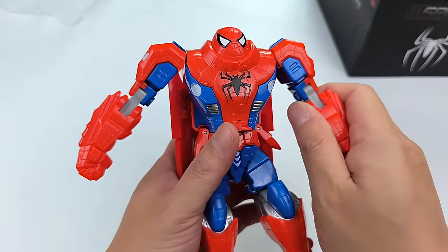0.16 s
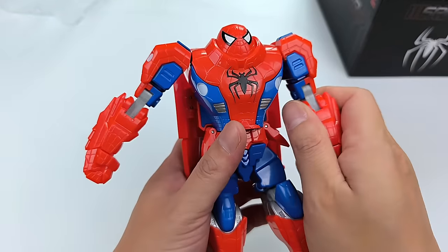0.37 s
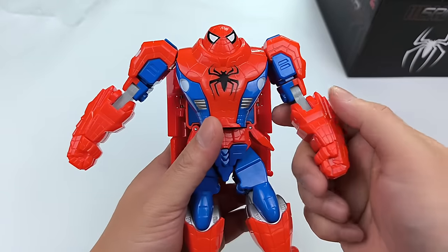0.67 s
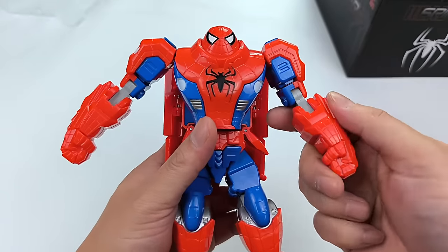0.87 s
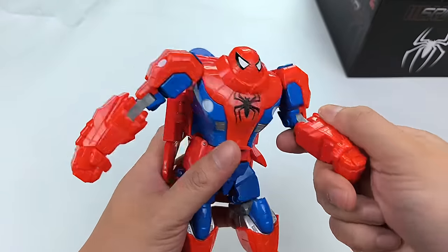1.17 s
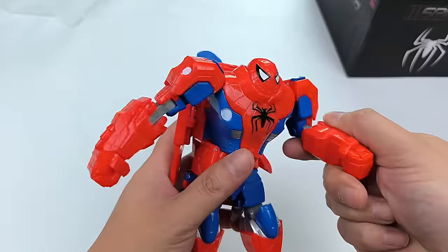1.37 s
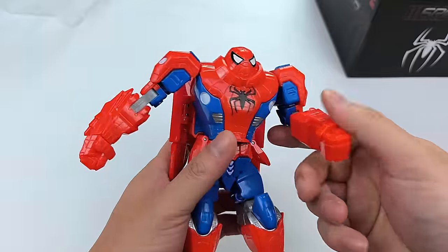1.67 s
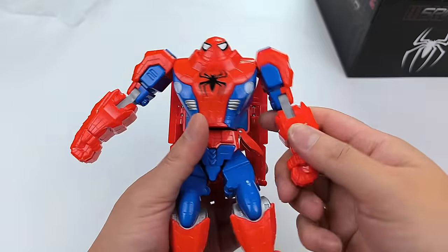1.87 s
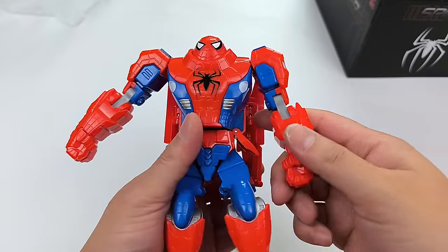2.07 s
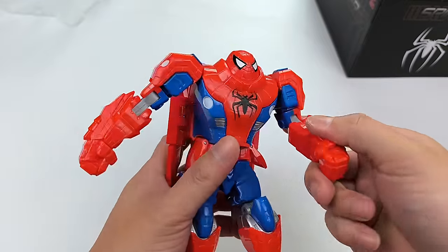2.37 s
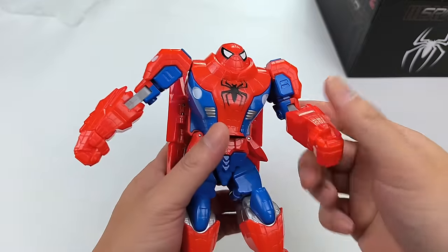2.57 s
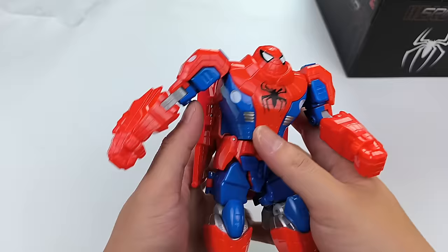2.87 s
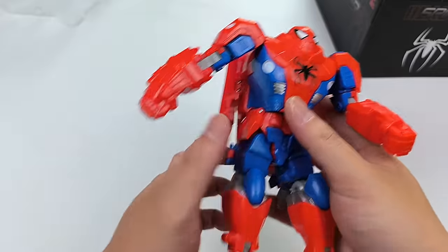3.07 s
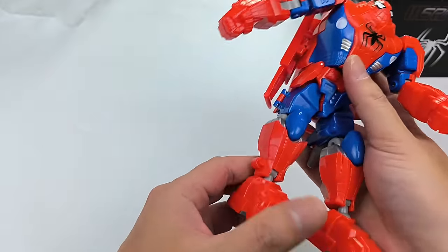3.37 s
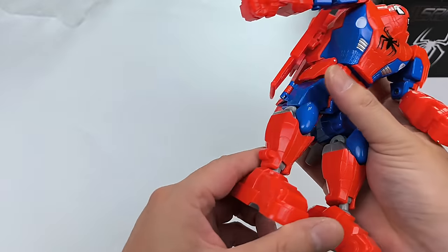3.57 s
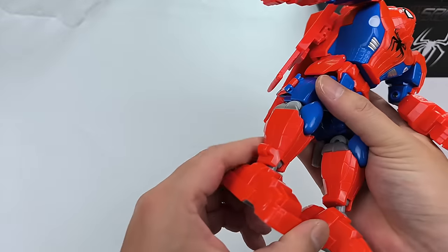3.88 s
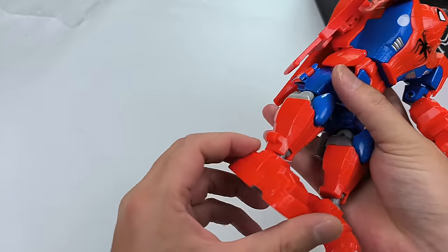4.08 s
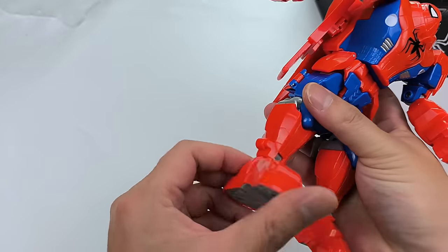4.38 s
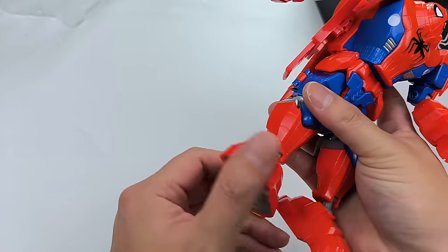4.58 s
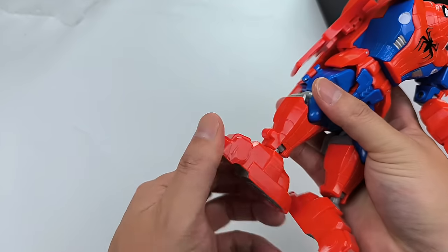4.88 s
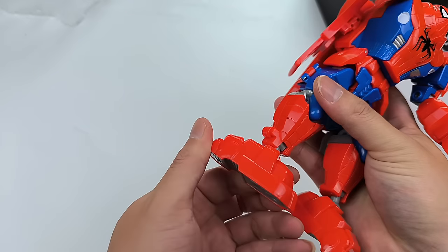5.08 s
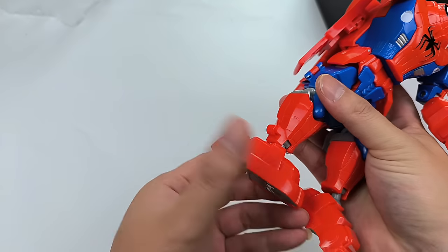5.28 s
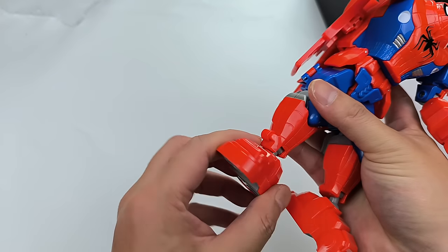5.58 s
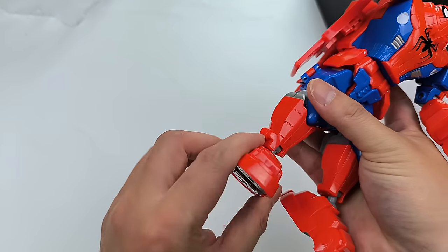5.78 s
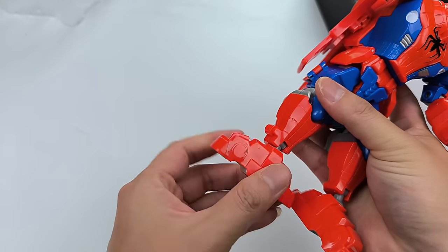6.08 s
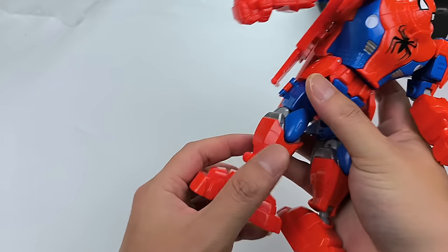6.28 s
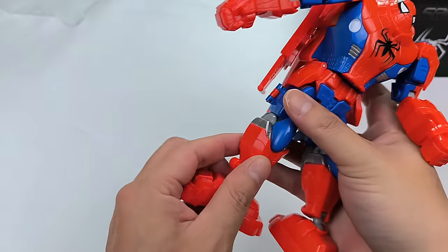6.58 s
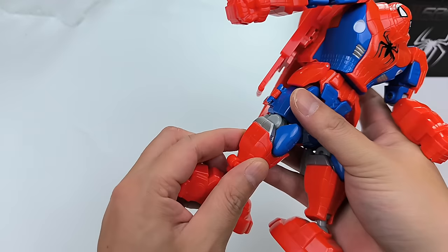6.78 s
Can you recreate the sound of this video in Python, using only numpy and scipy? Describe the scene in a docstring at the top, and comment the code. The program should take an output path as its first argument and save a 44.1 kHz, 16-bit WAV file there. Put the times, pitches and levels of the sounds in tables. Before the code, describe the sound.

Close, dry plastic clacks and clicking detents from a jointed toy figure in a small bright room, with light ticks and brief scrapes between.

```python
"""A hard plastic toy robot, posed by two hands just above a table, close to a stereo microphone in a small room.
Joint detents snap over and loose panels tick: each blow is a noise burst that rings the hollow shell for
a few milliseconds. Between the clicks joints and fingers rub by stick and slip, and a faint whistle glides.
The room answers with a bright tail of decaying noise, over a soft hush of shaped noise."""
import sys
import numpy as np
from scipy import signal
from scipy.fft import rfft, irfft
from scipy.io import wavfile
from scipy.ndimage import uniform_filter1d

SR = 44100
rng = np.random.default_rng(int(sys.argv[2]) if len(sys.argv) > 2 else 0)


def generate_wav(sig):
    """Save sig (samples, or channels by samples) to the path in sys.argv[1] as 16-bit PCM at SR."""
    pcm = np.round(np.clip(np.atleast_2d(sig).T, -1, 1) * 32767).astype(np.int16)
    wavfile.write(sys.argv[1], SR, pcm)


N = 305172

# The ranges that a blow excites, from the whole toy down to the contact point:
# knock, chest, panel, shell, edge, fizz. Each row: low edge in Hz, high edge in Hz.
REGISTERS = [(125, 900), (950, 1900), (1900, 3500), (3500, 6300), (6300, 9500), (9500, 17500)]
# Light ticks: their balance over the registers. Each entry: relative level in dB.
TICK_COLOUR = [-6.5, 3.63, 1.7, 1, -2.2, -16]
# A stiff joint snaps home. Each row: time in seconds, strength in dB, brightness in dB per octave,
# thump of the whole toy in dB, pitch of the struck part in Hz, rattle decay in seconds, left-right in dB.
JOINT_SNAPS = [(0.2001, -23, 3.5, 9.5, 5540, .0013, -1.5), (6.613, -25, -1, -9.5, 3260, 0.00164, -4),
               (6.884, -24.5, 1.5, 1, 4900, 0.00186, -5.5)]
# The shoulder ratchet jumps a tooth. Each row: time in seconds, crack in dB, brightness in dB per octave,
# pitch of the struck part in Hz, knock of the chest in dB, delay of that knock in seconds, left-right in dB.
RATCHET_TEETH = [(1.0319, -39.5, -1, 2310, -40.5, 0.0033, 0.5),
                 (1.1023, -52, -3, 1450, -40.5, 0.00092, 1.5), (1.3015, -43, 2.5, 7550, -40, 0.0028, 1),
                 (1.723, -33, 1.5, 4200, -40.5, .003, 0.5), (1.7787, -30, 1, 5100, -35, 0.0043, -0.5),
                 (1.8391, -32.5, 1, 4400, -38.5, .004, 0), (2.2454, -32, 1, 8100, -38.5, 0.0021, 1),
                 (2.305, -37, 0.5, 8200, -38.5, 0.0016, -1)]


def amp(db):
    """Decibels to gain."""
    return 10 ** (np.asarray(db) / 20)


def unit(x):
    """Scales to rms 1."""
    return x / np.sqrt(np.mean(x ** 2) + 1e-20)


def read(points, hz):
    """Reads a curve off its points on a log-frequency axis."""
    f, value = np.transpose(points)
    return np.interp(np.log(hz + 1), np.log(f), value)


def add(mix, s, sound):
    """Mixes a stereo sound in at time s."""
    start = max(round(s * SR), 0)
    part = mix[:, start:][:, :sound.shape[1]]
    part += sound[:, :part.shape[1]]


def band(x, low_hz, high_hz, order=3):
    """Causal band-pass."""
    edges_hz = [low_hz, min(high_hz, .49 * SR)]
    return signal.sosfilt(signal.butter(order, edges_hz, "band", fs=SR, output="sos"), x)


def pair(x, likeness):
    """Turns two unrelated signals into two partly alike channels."""
    c = np.clip(likeness, 0, 1)
    shared = np.array([[1], [1]]) * np.sqrt((1 + c) / 2) * x[0]
    opposed = np.array([[1], [-1]]) * np.sqrt((1 - c) / 2) * x[1]
    return shared + opposed


def causal(gain):
    """The minimum-phase response that has this gain, by folding its cepstrum."""
    cepstrum = irfft(np.log(gain + 1e-9))
    half = cepstrum.shape[-1] // 2
    cepstrum[..., 1:half] *= 2
    cepstrum[..., half + 1:] = 0
    return np.exp(rfft(cepstrum))


def hush(likeness=0.042, level_db=-63.5):
    """The steady, dull background of the room: noise filtered to a falling spectrum."""
    # Colour of the background. Each row: frequency in Hz, relative density in dB per Hz.
    hush_colour = [(15, -40), (25, -22), (161, -4.5), (373, -6.5), (427, -8), (503, -7.5), (1130, -12.5),
                   (1400, -12.5), (1560, -13), (2000, -13), (2550, -16), (3080, -16), (6920, -27),
                   (10400, -40.5), (16000, -29.5)]
    noise = pair(rng.standard_normal((2, N)), likeness)
    gain = amp(read(hush_colour, np.fft.rfftfreq(N, 1 / SR)))
    return amp(level_db) * unit(irfft(rfft(noise) * gain, N))


def blow(colour_db, strength_db, bright_db=0, hollow_db=0, thump_db=0, fizz_db=0):
    """Strength of each register: brightness tilts the colour up, the chest and the toy's bulk fill the bottom."""
    # How each register answers a blow. Each row: octaves of brightness tilt against the shell's register,
    # share of the chest's ring, share of the thump, share of the fizz.
    response = [(-1.5, .5, 1, 0), (-1.5, 1, .4, 0), (-.8, 0, 0, 0), (0, 0, 0, 0), (.7, 0, 0, 0),
                (1.5, 0, 0, 1)]
    return strength_db + np.array(colour_db) + np.array(response) @ [bright_db, hollow_db, thump_db, fizz_db]


def ticks(usual_decay_s=.0024, fizz_db_per_halving=8, part_db=13.5, focus_db=4.5, focus_octaves=0.55):
    """A light blow is lifted around the pitch of the part it strikes; the sooner it dies, the more it fizzes."""
    # A loose panel or finger joint ticks. Each row: time in seconds, strength in dB, brightness in dB per
    # octave, ring of the hollow chest in dB, pitch of the struck part in Hz, rattle decay in seconds,
    # left-right in dB.
    loose_parts = [(.079, -59.5, -0.5, 3, 2140, .0029, 1), (.11, -66, 2, 10.5, 2100, .0024, -1),
                   (.138, -63, 5.5, 10, 2170, 0.0025, -2.5), (.4954, -54, -2, -13.5, 2380, 0.0018, 0.5),
                   (.6038, -59.5, -2, -13, 2630, 0.0011, -7.5), (.6818, -51, 5.5, -3, 2700, .0024, 1.5),
                   (.6987, -59.5, 7, 8.5, 4070, 0.0017, 3), (.9904, -56.5, -4, -6.5, 2280, 0.0033, 4),
                   (1.358, -74.5, 2.5, 19.5, 1770, 0.0013, -9), (1.39, -64.5, 1, -1, 2350, 0.0017, 0),
                   (1.4048, -66, -6.5, -4.5, 2310, 0.0015, -1), (1.67, -63, -9, -8, 1720, 0.00272, .5),
                   (2.112, -67.5, -3.5, -4, 2600, 0.00245, -3), (2.125, -72.5, -7.5, -7, 2620, 0.00246, -2),
                   (2.1422, -72, -5.5, -8, 2500, 0.0013, 1), (2.2057, -75, -9, -6, 2440, 0.0012, -3),
                   (2.496, -61, 2, -17, 3300, .0016, -4.5), (2.502, -60.5, -2.5, -9, 3920, .0024, 2),
                   (2.5143, -67.5, -6, 2, 4480, 0.0032, 2), (2.5259, -65.5, 5, 10.5, 2170, .0028, -5),
                   (2.617, -64.5, -7.5, -15, 3120, 0.0021, -1.5), (2.7307, -62, 10.5, 11, 8750, 0.0016, 4),
                   (2.748, -53.5, 7, 2, 3900, 0.0024, 0.5), (2.7974, -56, 2, -1, 7100, 0.0038, -2),
                   (2.819, -64, -3, -3, 2450, 0.0029, 0), (2.8384, -56.5, 2, 7.5, 8500, 0.0026, .5),
                   (3.278, -73, 1, 4, 2600, .0022, -8), (3.365, -76, -6, -3, 2200, .002, 1),
                   (3.455, -73, 0.5, -2, 3100, .0021, -3.5), (3.5573, -66, 0, -12, 2210, .0026, -3),
                   (3.6299, -56, -1.5, -15, 3370, .003, -3), (3.9492, -62.5, 2.5, -0.5, 2744, 0.0033, -2),
                   (4.288, -62, 3.5, -9, 5730, .0022, -2), (4.5865, -67.5, .5, -5, 4580, .0024, 2),
                   (4.6224, -71.5, -5, -3, 2104, .0016, -5), (4.8818, -61.5, 2, 2, 4350, 0.0025, -3),
                   (5.1616, -66, 8, -3, 3920, .003, 13), (5.1792, -67.5, 4, -5, 4670, 0.002, -7.5),
                   (5.3111, -63, 4, -12, 3700, .0028, -2), (5.364, -66.5, -2, 3, 2820, .0029, -2),
                   (5.4253, -49, 2.5, -1.5, 1920, .0026, -0.5), (5.5828, -67.5, -2, -6.5, 2100, .0026, -1),
                   (5.7338, -51.5, 2, -9, 1980, .0032, -5), (5.866, -62.5, -2.5, -10, 2020, .0029, -3.5),
                   (5.9283, -56, 8, 4, 7110, 0.0015, 0), (6.0743, -64, 2, -7, 3610, 0.0034, 0),
                   (6.1644, -62.5, 3.5, -10, 3560, .0014, -1), (6.2437, -63.5, 2, 5, 1560, 0.0035, -1),
                   (6.36, -74, 10, -2, 5530, 0.0019, -1), (6.526, -61.5, 2, -10.5, 2020, .002, 0),
                   (6.5566, -70, 3, 15.5, 1970, .002, 0), (6.5743, -48.5, 1, -8, 7100, .003, -4)]
    centres_hz = np.sqrt(np.prod(REGISTERS, axis=1))
    for s, strength_db, bright_db, hollow_db, part_hz, decay_s, pan_db in loose_parts:
        octaves_away = np.log2(centres_hz / part_hz)
        focus = focus_db * np.exp(-(octaves_away / focus_octaves) ** 2)
        fizz_db = fizz_db_per_halving * np.log2(usual_decay_s / decay_s)
        strengths_db = blow(TICK_COLOUR, strength_db, bright_db, hollow_db, fizz_db=fizz_db) + focus
        yield s, decay_s, pan_db, part_hz, part_db, strengths_db


def faint_leads(lead_s=0.0025, level_db=-59, decay_s=.002, part_hz=3000, part_db=4):
    """A faint short blow set just ahead of each snap and detent."""
    # Balance of this faint blow over the registers. Each entry: relative level in dB.
    lead_colour = [-12.5, -3.5, -0.5, -1, -7, -8.5]
    for s, *_ in list(JOINT_SNAPS) + list(RATCHET_TEETH):
        yield s - lead_s, decay_s, 0, part_hz, part_db, blow(lead_colour, level_db)


def snaps(part_db=9):
    """Stiff joints snap home with one crisp blow each."""
    # Balance of a snap over the registers. Each entry: relative level in dB.
    snap_colour = [-18, -11.5, -5.5, 0.5, -1, -18]
    for s, strength_db, bright_db, thump_db, part_hz, decay_s, pan_db in JOINT_SNAPS:
        strengths_db = blow(snap_colour, strength_db, bright_db, thump_db=thump_db)
        yield s, decay_s, pan_db, part_hz, part_db, strengths_db


def detents(crack_s=0.00228, part_db=8, chest_s=0.00197, chest_hz=1550, chest_part_db=11,
            rebound_s=.0172, rebound_loss_db=-9, rebound_hz=1700, count=2):
    """The pawl cracks over a tooth, the hollow chest knocks just after, and the loose arm rebounds twice."""
    # Balance of the crack over the registers. Each entry: relative level in dB.
    crack_colour = [-14, -9.5, -6, -0.5, -1.5, -10.5]
    # Balance of the chest's knock over the registers. Each entry: relative level in dB.
    chest_colour = [-12.5, 1.5, -6.5, -32, -21.5, -31]
    # Balance of the arm's rebound over the registers. Each entry: level in dB against the chest's knock.
    rebound_colour = [-13, -10.5, -18, -15.5, -16.5, -28]
    for s, crack_db, bright_db, part_hz, chest_db, delay_s, pan_db in RATCHET_TEETH:
        yield s, crack_s, pan_db, part_hz, part_db, blow(crack_colour, crack_db, bright_db)
        yield s + delay_s, chest_s, pan_db, chest_hz, chest_part_db, blow(chest_colour, chest_db)
        for k in range(count):
            strengths_db = blow(rebound_colour, chest_db + k * rebound_loss_db)
            yield s + (k + 1) * rebound_s, crack_s, pan_db, rebound_hz, chest_part_db, strengths_db


def rattle(decay_s, linger_db=-21, linger_s=0.0079, likeness=0.51, size=2048):
    """A blow scatters through the joined parts: a dense burst, even in colour, that dies in milliseconds."""
    t = np.arange(size) / SR
    rise = 1 - np.exp(-t / .00012)
    fade = rise * (np.exp(-t / decay_s) + amp(linger_db) * np.exp(-t / linger_s))
    z = rfft(pair(rng.standard_normal((2, size)), likeness) * fade)
    smoothed = np.sqrt(uniform_filter1d(abs(z) ** 2, size=17, axis=1))
    return z / causal(smoothed)  # flattens the colour


def click(decay_s, pan_db, part_hz, part_db, strengths_db, part_q=11, push_db=3, push_hz=300, lag=.8,
          port_delay_s=.00002):
    """The burst rings the struck part and the body; where the toy is struck sets each register's strength."""
    # Modes of the plastic body. Each row: frequency in Hz, level in dB above the rattle, width in Hz.
    body_modes = [(796, 9.5, 90), (1360, 5.5, 240), (1546, 9, 86), (2600, 4.5, 110), (3770, -0.5, 230),
                  (4527, 3, 870), (5090, 2, 200), (7710, 8, 600)]
    # How the two microphone ports colour near sounds. Each row: frequency in Hz, left-right in dB.
    port_colour = [(200, -0.5), (3000, 1.5), (6000, 0), (7000, -10), (7800, -10), (8600, 3.5), (9300, 11.5),
                   (11500, -1), (15000, 2)]
    decay_s = max(decay_s, .0003)
    z = rattle(decay_s)
    hz = np.linspace(0, SR / 2, z.shape[1])
    # the whole toy jumps, most under a crisp snap
    z = z + amp(push_db) * (0.0025 / decay_s) / (1 + 1j * hz / push_hz)
    modes = list(body_modes) + [(part_hz, part_db, part_hz / part_q)]
    peaks = sum(amp(db) ** 2 / (1 + (2 * (hz - f) / width) ** 2) for f, db, width in modes)
    balance = amp(np.array([[.5], [-.5]]) * (read(port_colour, hz) + pan_db))
    # the left port hears it a moment later
    arrival = np.exp(-2j * np.pi * hz * np.array([[port_delay_s], [0]]))
    ring = irfft(z * causal(np.sqrt(1 + peaks) * balance) * arrival)
    parts = [amp(db) * unit(band(ring, *edges)) for db, edges in zip(strengths_db, REGISTERS)]
    # a loose joint reaches the hollow chest late
    late = round(lag * max(decay_s - .0015, 0) * SR)
    parts[1] = np.roll(parts[1], late, axis=1)
    # each register's strength is its rms as if all its energy fell within 10 ms
    return sum(parts) * np.sqrt(SR / 100 / ring.shape[1])


def clicks(hard_db=-28, send_slope=0.13):
    """Every snap and tick, near and as sent to the room: light ones are sent more weakly and leave less tail."""
    near, sent = np.zeros((2, 2, N))
    for s, decay_s, pan_db, part_hz, part_db, strengths_db in [*faint_leads(), *snaps(), *detents(), *ticks()]:
        sound = click(decay_s, pan_db, part_hz, part_db, strengths_db)
        quiet_send_db = send_slope * min(max(strengths_db) - hard_db, 0)
        add(near, s - .0002, sound)
        add(sent, s - .0002, sound * amp(quiet_send_db))
    return near, sent


def room(x, build_s=0.0046, lean_db=0.5):
    """A diffuse tail: sparse random echoes that build up, then die at a rate set for each band."""
    # Reverberation time. Each row: frequency in Hz, time to fall by 60 dB in seconds.
    room_t60 = [(150, 0.52), (700, .5), (1600, 0.46), (4000, 0.56), (8000, .56), (15000, 0.46)]
    # Colour of the tail. Each row: frequency in Hz, gain in dB.
    room_gain = [(150, -18.5), (600, -14.5), (1100, -10), (1650, -7), (2100, -5.5), (3000, -7.5),
                 (4200, -9.5), (5500, -8), (8000, -12.5), (11000, -11.5), (15000, -8)]
    t = np.arange(SR) / SR
    echoes = rng.standard_normal((2, SR)) * (rng.random((2, SR)) < .15)
    echoes = echoes * (1 - np.exp(-(t / build_s) ** 2))
    hz, at, z = signal.stft(echoes, SR, nperseg=256)
    z = z * amp(-60 * at / read(room_t60, hz)[:, None])
    tail = signal.istft(z * amp(read(room_gain, hz))[:, None], SR, nperseg=256)[1]
    uncoloured = signal.istft(z, SR, nperseg=256)[1]
    tail = tail / np.linalg.norm(uncoloured[0])
    return signal.fftconvolve(x, tail, axes=1)[:, :N] * amp(np.array([[.5], [-.5]]) * lean_db)


def rubs(slips_per_s=220, smooth=1.0, scrape_low_hz=3200, scrape_high_hz=7500, taper=0.26, build_db=4):
    """Stick and slip: tiny uneven catches scrape and ring two narrow resonances, louder as pressure builds."""
    # Plastic sliding on plastic or skin. Each row: start in seconds, end in seconds, squeak pitch in Hz,
    # squeak level in dB, scrape level in dB (both before the pressure and the fades).
    strokes = [(1.35, 1.467, 2390, -66.5, -69.5), (2.708, 2.879, 3750, -72, -60.5),
               (2.869, 3.09, 2510, -74.5, -71), (3.947, 4.086, 2630, -57.5, -62),
               (4.162, 4.23, 2860, -68.5, -78), (4.542, 4.7, 2250, -76.5, -74.5),
               (4.725, 4.798, 3700, -74.5, -66.5), (5.131, 5.199, 4470, -72, -67),
               (5.236, 5.3, 3830, -67, -69), (5.353, 5.39, 2780, -54.5, -65.5),
               (5.383, 5.429, 4120, -66, -60), (5.499, 5.532, 3660, -66, -67),
               (5.678, 5.731, 4930, -77, -70), (6.054, 6.18, 4460, -72.5, -73)]
    # The squeak's two resonances. Each row: factor on the squeak's pitch, width in Hz, relative level in dB.
    squeak_bands = [(0.998, 205, 0.5), (1.13, 440, -2.5)]
    out = np.zeros((2, N))
    catches = (rng.random(N) < slips_per_s / SR) * rng.rayleigh(1, N)
    # a steady grain under the catches
    drive = pair(rng.choice([-1., 1.], (2, N)), 0.11) * (unit(catches) + smooth)
    for start, end, hz, squeak_db, scrape_db in strokes:
        friction = drive[:, round(start * SR):round(end * SR)]
        squeak = sum(amp(db) * unit(band(friction, hz * k - width / 2, hz * k + width / 2, order=2))
                     for k, width, db in squeak_bands)
        scrape = band(friction, scrape_low_hz, scrape_high_hz, order=2)
        stroke = amp(squeak_db) * unit(squeak) + amp(scrape_db) * unit(scrape)
        pressure = amp(build_db * np.linspace(-.5, .5, stroke.shape[1]))
        add(out, start, pressure * stroke * signal.windows.tukey(stroke.shape[1], taper))
    return out


def whistle(waver=0.0099, level_db=-82.5, taper=0.45):
    """A very faint, thin sine that swells, slides in pitch with a slight waver, and fades."""
    # The glides, one table each. Each row: time in seconds, pitch in Hz.
    glides = [
        [(1.44, 8800), (1.52, 8150), (1.61, 7950), (1.65, 7330), (1.72, 6950)],
        [(4.38, 6410), (4.48, 7430), (4.57, 8600), (4.63, 7800), (4.74, 7500)],
        [(4.92, 6550), (4.98, 6640), (5.07, 6250)],
    ]
    out = np.zeros((2, N))
    for glide in glides:
        s, hz = np.transpose(glide)
        t = np.arange(s[0], s[-1], 1 / SR)
        wander = unit(uniform_filter1d(rng.standard_normal(N), size=60))[:len(t)]
        pitch = np.interp(t, s, hz) * (1 + waver * wander)
        tone = np.sin(2 * np.pi * np.cumsum(pitch) / SR)
        tone = tone * amp(level_db) * signal.windows.tukey(len(t), taper)
        add(out, s[0], np.array([tone, tone]))
    return out


def handling(count=56, faint_db=-77, spread_db=5, bright_db=1, bright_spread_db=3, decay_s=0.00177,
             part_db=11, low_hz=1700, octaves=1.7, pan_db=8):
    """Tiny ticks of loose parts, scattered at random, while the hands shift their grip and work the foot."""
    # The stretch of regripping: start and end in seconds.
    regrip_s = (2.7, 6.6)
    out = np.zeros((2, N))
    for when, pitch, side, size, tilt in rng.random((count, 5)):
        brightness = bright_db + bright_spread_db * (tilt - .5)
        strengths_db = blow(TICK_COLOUR, faint_db + spread_db * size, brightness)
        part_hz = low_hz * 2 ** (octaves * pitch)
        sound = click(decay_s, pan_db * (side - .5), part_hz, part_db, strengths_db)
        add(out, np.interp(when, [0, 1], regrip_s), sound)
    return out


def scene(rub_room_db=-5):
    """The toy, its room and the background."""
    near, sent = clicks()
    fingers = rubs() + handling()
    reverb = room(sent + amp(rub_room_db) * fingers)
    return near + fingers + reverb + whistle() + hush()


def limiter(x, ceiling_db=-12.0, recovery_db_per_s=80):
    """Turns the gain down at once under the hardest snaps and lets it back over the room's tail."""
    power = uniform_filter1d((x ** 2).mean(0), size=66)
    power_db = 10 * np.log10(abs(power) + 1e-12)
    fall = np.arange(N) * recovery_db_per_s / SR
    held_db = np.maximum.accumulate(power_db + fall) - fall  # peaks that sink at the recovery rate
    over_db = np.maximum(held_db - ceiling_db, 0)
    return x / amp(uniform_filter1d(over_db, size=30))


def record(dry, edge_hz=16200):
    """The recorder's limiter and band limit, a steep low-pass."""
    low_pass = signal.firwin(301, edge_hz, window=("kaiser", 8), fs=SR)
    return signal.oaconvolve(limiter(dry), low_pass[None], "same")


dry = scene()
out = record(dry)
generate_wav(out)
```